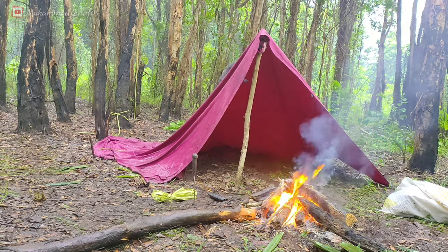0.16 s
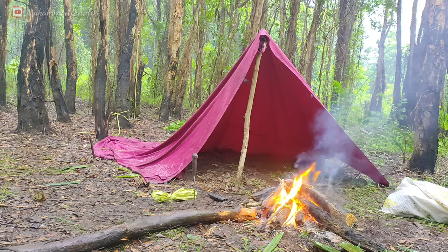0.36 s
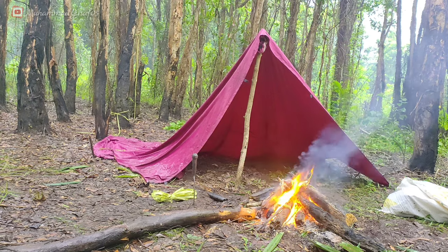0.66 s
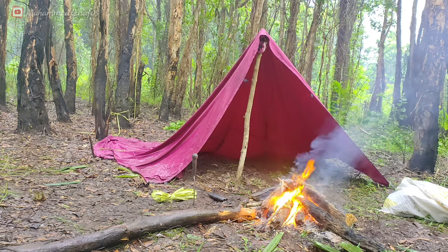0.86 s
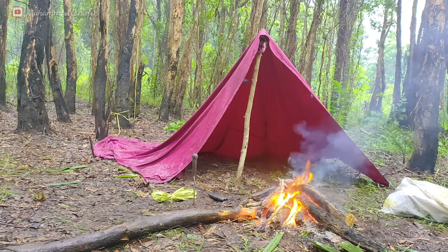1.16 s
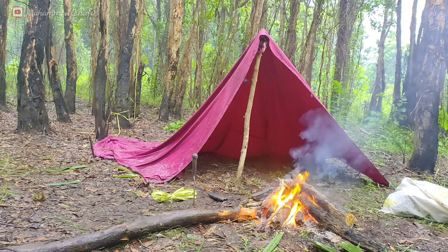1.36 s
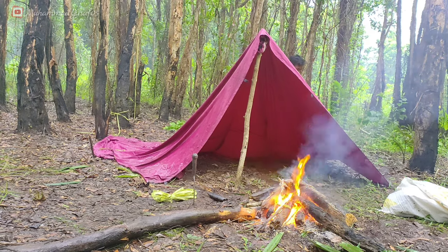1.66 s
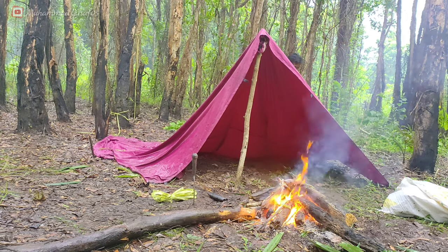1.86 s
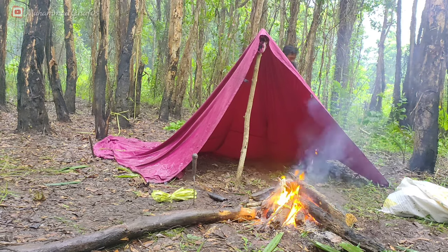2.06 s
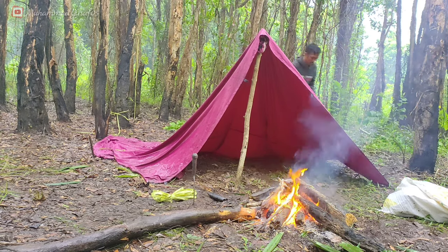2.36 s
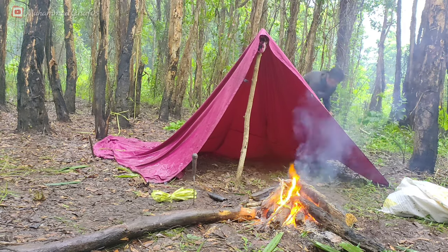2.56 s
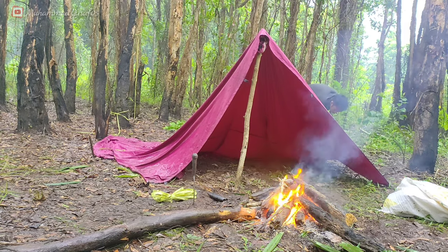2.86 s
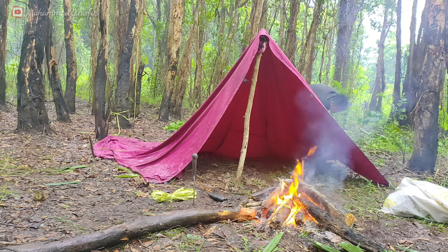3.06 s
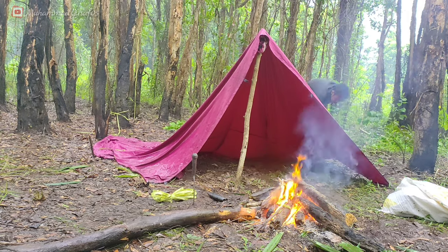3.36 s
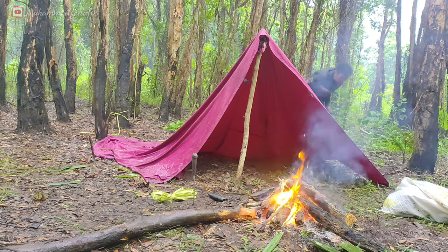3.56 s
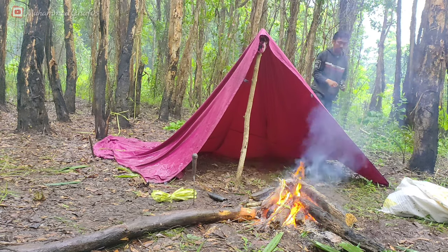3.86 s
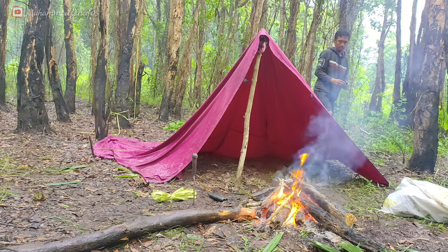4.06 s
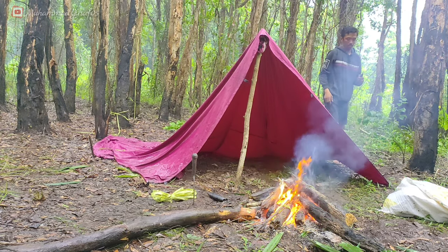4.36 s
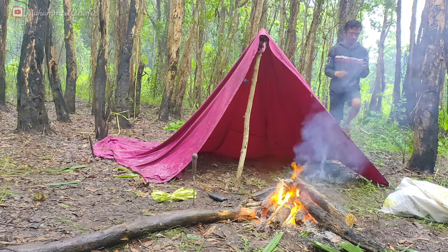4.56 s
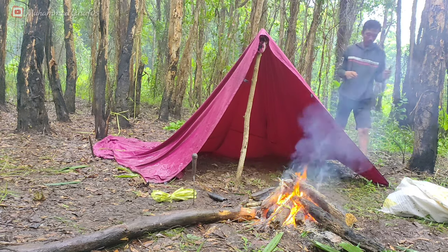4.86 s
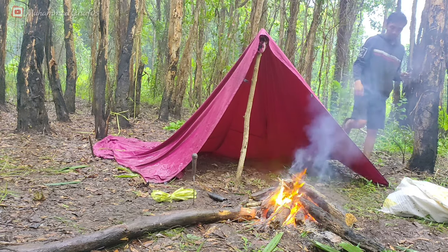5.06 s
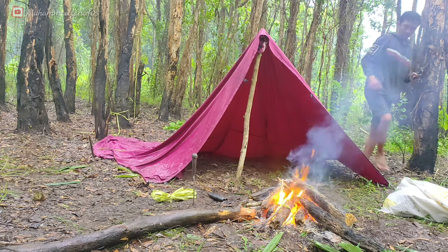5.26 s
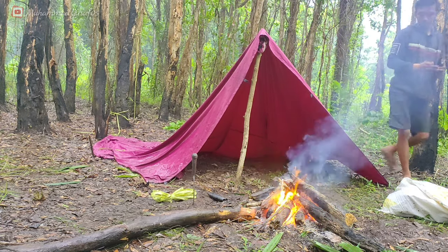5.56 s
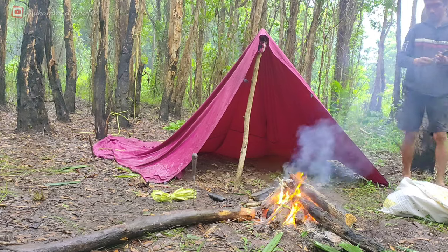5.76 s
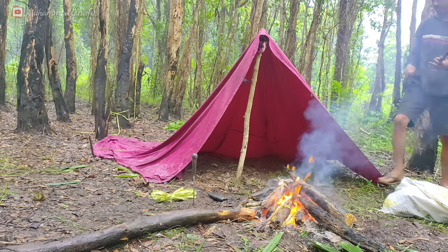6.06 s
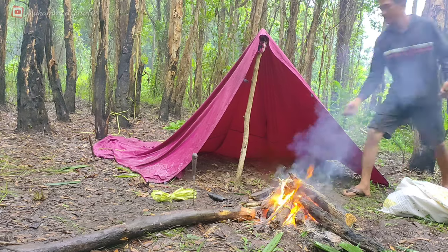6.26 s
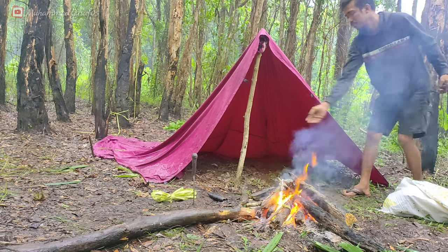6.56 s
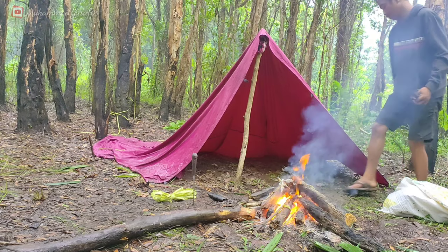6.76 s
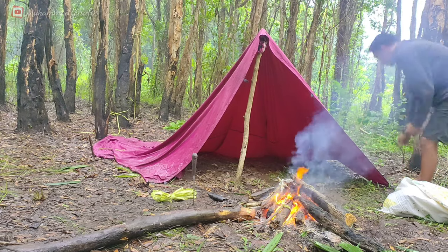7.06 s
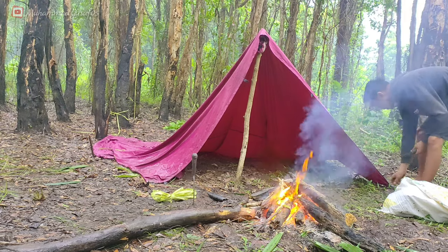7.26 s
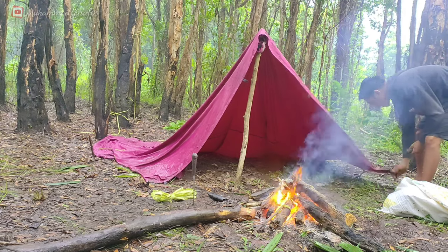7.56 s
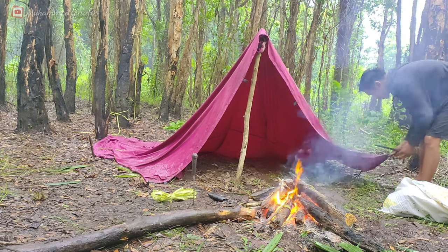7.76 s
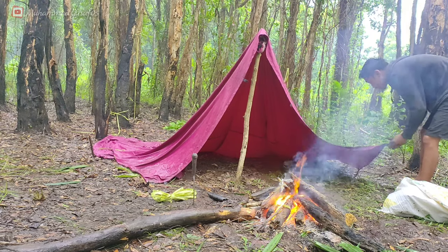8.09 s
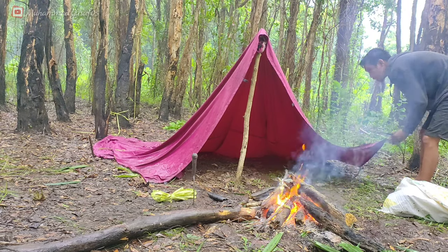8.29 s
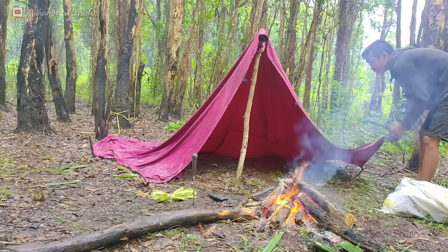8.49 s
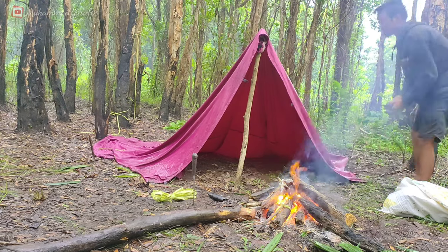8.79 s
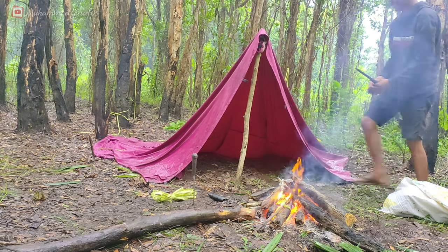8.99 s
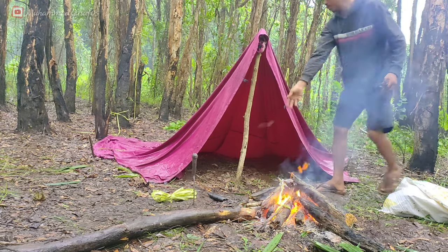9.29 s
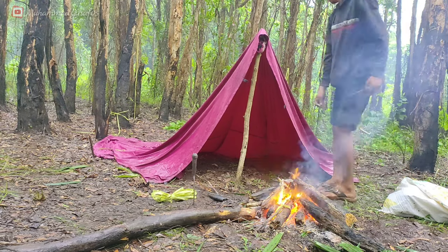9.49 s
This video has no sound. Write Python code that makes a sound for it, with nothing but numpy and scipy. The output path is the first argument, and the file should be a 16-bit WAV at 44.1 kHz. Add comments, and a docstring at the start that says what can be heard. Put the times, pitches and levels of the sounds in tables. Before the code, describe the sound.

Close stereo microphones at a forest camp hear irregular campfire cracks on the left, with fine crackle, bubbling sap and short hisses. Insects and birds fill the distance: cicada tone and buzz in regular alternation, brisk falling calls in the centre, evenly paced low pipes and thin whistles on the left. Occasional hollow knocks and low thuds land left or right. In the last third a rhythmic bush cricket rasp joins on the right, and pops grow denser.

```python
"""Campfire in a forest

A small campfire burns on the left: wood pops and steam spits are short puffs of noise, and
embers tick as tiny ringing clicks. A far insect, likely a cicada, alternates a thin gliding tone
with a buzz built from harmonics. One caller repeats quick falling notes in twos and threes,
another pipes low phrases, birds chirp. Dull knocks and low thuds sound, some under the wood pops.
In the last third a bush cricket, made of noisy wing resonances, starts to rasp on the right.
"""
import sys
import numpy as np
from scipy import signal
from scipy.fft import rfft, irfft
from scipy.io import wavfile

SR = 44100
rng = np.random.default_rng(int(sys.argv[2]) if len(sys.argv) > 2 else 0)


def file_out(sig):
    """Save sig as 16-bit WAV at sys.argv[1]."""
    # one column per channel
    cols = np.atleast_2d(sig).T
    # limit, then scale
    lim = np.clip(cols, -1, 1)
    pcm = np.round(lim * 32767).astype(np.int16)
    wavfile.write(sys.argv[1], SR, pcm)


N = 424683  # length in samples


def from_db(db):
    """Turn decibels into a gain."""
    return np.exp(np.asarray(db) * (np.log(10) / 20))


def rms_one(x):
    """Scale a sound to an rms of 1."""
    return x / np.sqrt(np.mean(x ** 2) + 1e-20)


def in_time(rows):
    """Read each column of a table as a curve, with a value at every sample."""
    s, *columns = np.transpose(rows)
    return [np.interp(np.arange(N) / SR, s, column) for column in columns]


def clock(length_s):
    """Give the sample times of a short sound, in seconds."""
    return np.arange(int(length_s * SR)) / SR


def add(track, s, sound):
    """Mix a sound into a track at time s."""
    i = int(np.clip(s * SR, 0, N - 1))
    track[i:i + len(sound)] += sound[:N - i]


def colour(x, points):
    """Make some pitches stronger and others weaker, following a curve of pitch and level."""
    hz, db = np.transpose(points)
    f = np.maximum(np.arange(N // 2 + 1) * SR / N, 1)
    gain = from_db(np.interp(np.log(f), np.log(hz), db))
    return irfft(rfft(x) * gain, N)


def band(x, hz, width_hz, order=2):
    """Keep only the pitches around a centre."""
    low = np.sqrt(hz ** 2 + width_hz ** 2 / 4) - width_hz / 2
    edges = np.clip([low, low + width_hz], [10, 20], [.43 * SR, .45 * SR])
    sos = signal.butter(order, edges, "band", fs=SR, output="sos")
    return signal.sosfilt(sos, x + 1e-18)


def drift(rate_hz):
    """Wander at random around zero, in straight lines between random points."""
    knots = rng.standard_normal(8000)
    return np.interp(np.arange(N) * rate_hz / SR, np.arange(len(knots)), knots)


def pan(x, left_db):
    """Place a sound left or right; left_db is how much louder the left side is."""
    return x * from_db([[left_db / 2], [-left_db / 2]])


def trees(x, t60_s, scatter_db):
    """Trunks and leaves return a dying spray of uneven echoes, different on each side."""
    t = clock(.6)
    unevenness = from_db(scatter_db * rng.standard_normal((2, len(t))))
    echoes = rng.standard_normal((2, len(t))) * unevenness
    echoes = echoes * from_db(-60 * t / t60_s) * (t > .003)
    echoes /= np.sqrt(np.sum(echoes ** 2, axis=1, keepdims=True))
    return signal.fftconvolve(x[None], echoes, axes=1)[:, :N]


def burst(hz, width_hz, decay_s, order=2):
    """A dying puff of noise through a resonance, with the energy of 1 ms at full scale."""
    t = clock(.06)
    puff = band(rng.standard_normal(len(t)) * np.exp(-t / decay_s), hz, width_hz, order=order)
    return puff * np.sqrt(SR / 1000 / np.sum(puff ** 2))


def note(length_s, start_hz, end_hz, bend=1, waver=0.0068, flutter_db=0):
    """A whistled glide that swells and fades, its pitch and strength slightly unsteady."""
    u = clock(length_s) / length_s
    wobble, flutter = [np.interp(u, np.linspace(0, 1, 14), knots)
                       for knots in rng.standard_normal((2, 14))]
    hz = (start_hz + (end_hz - start_hz) * u ** bend) * (1 + waver * wobble)
    swell = np.sin(np.pi * u) * from_db(flutter_db * flutter)
    return swell * np.sin(2 * np.pi * np.cumsum(hz) / SR)


# tone colour of the air in the leaves: pitch_hz, relative level_db
LEAF_AIR_COLOUR = [(300, -5.5), (700, 2.5), (1500, 3.5), (2500, 2), (3800, 1.5), (4700, -4), (5600, 4.5),
                   (7800, -9.5), (9000, -4), (12000, -4.5), (15000, -2.5)]


def forest():
    """Soft air in the leaves is shaped noise; the hum of far insects is a narrow band of noise."""
    # one part shared by both sides, one part separate for each
    air = rng.standard_normal(N) + 0.97 * rng.standard_normal((2, N))
    air = from_db(-45.3) * rms_one(colour(air, LEAF_AIR_COLOUR))
    hum = band(rng.standard_normal(N) + .7 * rng.standard_normal((2, N)), 4640, 650)
    return air + from_db(-55.5 + 3 * drift(14)) * rms_one(hum)


# the cicada's cycle: a thin tone, then a buzz that overlaps its end
CICADA_START_S, CYCLE_S, TONE_S = -.025, .768, 0.261
BUZZ_AFTER_S, BUZZ_S, BUZZ_FADE_S = .2, .57, 0.064
TONE_HZ, TONE_SAG_HZ, BUZZ_HZ = 3003, 80.3, 1541
# strength of the thin tone, before its pulse and flutter: time_s, level_db
CICADA_TONE_LEVEL = [(0,-43), (.85,-41.5), (2.4,-49), (3.9,-49), (4.7,-43), (6.2,-44.5), (7,-49), (7.8,-45),
                     (9.63,-56)]
# harmonics of the buzz: multiple of BUZZ_HZ, relative level_db
BUZZ_HARMONICS = [(2,-57), (3,-47.5), (4,-52), (5,-55.5)]


def cicada(pulse_hz=18, pulse_depth=.24, jitter=.026, flutter_db=3):
    """A far cicada alternates a softly pulsing, sagging tone with a rough harmonic buzz."""
    tone, effort = np.zeros((2, N))
    t = clock(BUZZ_S)
    swell = np.clip(np.minimum(t, BUZZ_S - t) / BUZZ_FADE_S, 0, 1)
    for s in np.arange(CICADA_START_S, N / SR, CYCLE_S):
        add(tone, s, note(TONE_S, TONE_HZ, TONE_HZ - TONE_SAG_HZ, waver=.004, flutter_db=3.5))
        add(effort, s + BUZZ_AFTER_S, swell)
    pulse = 1 + pulse_depth * np.sin(2 * np.pi * pulse_hz * np.arange(N) / SR)
    tone *= from_db(in_time(CICADA_TONE_LEVEL)[0]) * pulse

    # fast pitch jitter makes the buzz rough
    phase = 2 * np.pi * np.cumsum(BUZZ_HZ * (1 + jitter * drift(700))) / SR
    buzz = sum(from_db(db) * rms_one(np.sin(round(k) * phase)) for k, db in BUZZ_HARMONICS)
    buzz = buzz * effort * from_db(flutter_db * drift(17))
    buzz = from_db(-3) * buzz + from_db(-4) * trees(buzz, t60_s=0.17, scatter_db=2)
    tone = tone + from_db(-7) * trees(tone, t60_s=.37, scatter_db=7)
    return pan(tone, left_db=-2.0) + pan(buzz, left_db=-0.8)


# rising chirps: start_s, length_s, start_hz, end_hz, relative level_db
BIRD_CHIRPS = [(0.39, 0.044, 9260, 11780, -8.5), (0.592, 0.03, 5150, 7300, -13.5),
               (0.618, 0.021, 7520, 11360, -11.5), (0.793, 0.05, 5600, 8000, -16),
               (0.834, 0.012, 7830, 10700, -12.5), (3.129, 0.018, 3680, 4620, -9),
               (3.139, 0.027, 3480, 4500, -24), (5.63, 0.027, 7120, 9970, -18),
               (5.647, 0.03, 10460, 11400, -20), (5.836, .04, 6070, 9840, -20.5),
               (5.876, 0.029, 9800, 10240, -15.5), (5.985, 0.057, 6120, 6770, -18),
               (6.03, 0.022, 7300, 11400, -17), (6.047, 0.033, 6280, 6490, -18.5)]
# thin whistles and short slurs: start_s, length_s, start_hz, end_hz, relative level_db
BIRD_WHISTLES = [(0.265, 0.064, 7660, 7660, -39), (0.548, 0.088, 4650, 4750, -34),
                 (1.621, 0.25, 6780, 6310, -47.5), (2.6, 0.045, 4680, 3760, -35.5),
                 (2.655, 0.02, 4440, 4570, -26.5), (4.077, 0.043, 4150, 4630, -36.5),
                 (4.968, 0.14, 6310, 6700, -40.5), (5.078, 0.17, 6700, 6140, -39),
                 (5.418, 0.048, 8830, 8750, -31), (5.767, 0.013, 4150, 3810, -28.5),
                 (7.489, 0.033, 4600, 4130, -26.5), (7.53, 0.04, 4290, 4870, -29.5),
                 (8.184, 0.12, 6700, 6440, -40), (8.42, 0.038, 4550, 4400, -35),
                 (8.465, 0.037, 4390, 5090, -34)]


def birds():
    """Gliding notes: rising chirps on the left, smeared by the trees, and thin whistles farther off."""
    chirps, far = np.zeros((2, N))
    for s, length_s, start_hz, end_hz, db in BIRD_CHIRPS:
        chirp = note(length_s, start_hz, end_hz, bend=1.1, waver=.028, flutter_db=5)
        add(chirps, s, from_db(db - 19) * chirp)
    for s, length_s, start_hz, end_hz, db in BIRD_WHISTLES:
        whistle = note(length_s, start_hz, end_hz, waver=.022, flutter_db=4.5)
        add(far, s, from_db(db - 7.5) * whistle)
    chirps = chirps + from_db(5.5) * trees(chirps, t60_s=.26, scatter_db=-2.0)
    far = far + from_db(1) * trees(far, t60_s=0.29, scatter_db=-3.5)
    return pan(chirps, left_db=20.5) + pan(far, left_db=26.5)


# phrases of low notes: start_s, number of notes, step_s from note to note,
# first_hz, last_hz, relative first_db, relative last_db
PIPED_PHRASES = [(.035,2,.2,2145,2128,-20,-20), (.53,4,0.22,1900,1930,-26,-23),
                 (1.423,5,0.23,1905,1940,-32,-32.5), (2.74,3,0.21,1998,2170,-23,-22.5),
                 (3.36,4,.211,2155,2105,-32.5,-23), (5.3,6,.2225,2090,2140,-27.5,-23),
                 (7.772,5,0.22,2090,2160,-22,-22.5)]


def piping(uneven_db=1.5, uneven_hz=22):
    """Evenly paced low wavering notes on the left; pitch and strength slide along each phrase."""
    out = np.zeros(N)
    for start, notes, step, first_hz, last_hz, first_db, last_db in PIPED_PHRASES:
        phrase = np.linspace([first_hz, first_db], [last_hz, last_db], int(round(notes)))
        for k, (hz, db) in enumerate(phrase):
            gain = from_db(db - 15.5 + uneven_db * rng.standard_normal())
            hz = hz + uneven_hz * rng.standard_normal()
            pipe = note(0.0303, hz * .99, hz * 1.01, waver=.028, flutter_db=2.5)
            add(out, start + k * step, gain * pipe)
    return pan(out + trees(out, t60_s=.28, scatter_db=6), left_db=28)


SECOND_NOTE_S = .0445  # from the first note to the second
# falling calls: start_s, wait_s from second note to third (0 means only two notes)
FALLING_CALLS = [(.045,0.049), (.583,.053), (1.068,0.068), (1.667,0.047), (2.281,.048), (2.738,.052),
                 (3.161,0), (3.449,0.049), (3.825,.052), (4.29,0.049), (4.829,.053), (5.313,.067),
                 (5.911,.049), (6.369,0), (6.681,.045), (7.139,0.051), (7.56,0), (7.847,0.052),
                 (8.224,0.055), (8.691,0.045), (9.228,.053)]
# strength of the calls: time_s, peak level_db of the notes before octave and echoes
FALLING_CALL_LEVEL = [(0, -23.5), (6.3, -23.5), (6.5, -26.5), (9.6, -27.5)]


def triplets(start_hz=5280, end_hz=4520):
    """Quick falling notes in twos and threes from straight ahead; squaring them adds a faint octave."""
    out = np.zeros(N)
    for s, wait in FALLING_CALLS:
        delays = [0, SECOND_NOTE_S]
        if wait > SECOND_NOTE_S / 2:
            delays.append(SECOND_NOTE_S + wait)
        for delay in delays:
            add(out, s + delay - .001, note(0.0271, start_hz, end_hz))
    out = out + from_db(-16) * band(out ** 2, 9800, 3000)
    out *= from_db(in_time(FALLING_CALL_LEVEL)[0])
    return out + from_db(-21) * trees(out, t60_s=.39, scatter_db=-29)


RASP_START_S, RASP_DB = 6.908, -34
# pace of the bush cricket, which slows briefly, then speeds up and eases at the end:
# time_s, gap_s between strokes
STROKE_PACE = [(6.908,.119), (7.027,.136), (7.69,.126), (8.18,.118), (8.63,.101), (8.94,.102), (9.47,.118)]


def stroke_times():
    """Each stroke of the bush cricket follows the last at its present pace."""
    times = [RASP_START_S]
    while times[-1] < N / SR:
        times.append(times[-1] + np.interp(times[-1], *np.transpose(STROKE_PACE)))
    return times[:-1]


# resonances of the wing, before they rise: pitch_hz, width_hz, relative level_db
WING_RESONANCES = [(2650, 210, -1.5), (5440, 880, -1.5), (6700, 1350, 0.5), (7970, 660, 2)]


def bush_cricket(stroke_s=0.01104, grain_db=3, rise=.06, scrape_db=-10):
    """Each stroke drags a file over the wing, whose resonances rise as it tightens."""
    t = clock(.14)
    middle = t.mean()
    u = (t - middle) / stroke_s
    swell = 1 / (1 + u ** 2 / 2) ** 2
    strokes, tension = np.zeros((2, N))
    for s in stroke_times():
        add(strokes, s - middle, from_db(RASP_DB) * swell)
        add(tension, s - middle, rise * u * np.sqrt(swell))
    wing = from_db(scrape_db) * rms_one(band(rng.standard_normal(N), 3500, 4300))
    for hz, width_hz, db in WING_RESONANCES:
        # slow noise times a sine gives a noisy band that can glide
        slow = signal.butter(2, width_hz / 2, fs=SR, output="sos")
        unsteady = signal.sosfilt(slow, rng.standard_normal(N))
        carrier = np.sin(2 * np.pi * np.cumsum(hz * (1 + tension)) / SR)
        wing = wing + from_db(db) * rms_one(unsteady * carrier)
    grainy = rms_one(wing * from_db(grain_db * drift(400)))
    return pan(strokes * grainy, left_db=-9)


# dull knocks, hollow plops, and the low thuds and mid knocks under some wood pops: start_s,
# level_db (energy against 1 ms at full scale), pitch_hz, width_hz, left_db (how much louder left)
KNOCKS_AND_THUDS = [(.638,-13.5,616,640,13), (.945,-9,610,695,13), (1.334,-16.5,473,203,12),
                    (1.481,-25.5,325,148,-23), (1.49,-27,895,397,-16), (1.622,-25.5,770,246,-11),
                    (1.785,-17.5,660,640,10), (2.5263,-7,475,1050,-12.5), (2.603,-7,420,860,-30),
                    (3.1092,-10,540,1460,-29), (4.363,-22.5,1170,250,21), (4.98,-16,690,630,13),
                    (5.425,-13.5,1310,1110,18), (5.5396,-21.5,915,900,12), (6.734,-6.5,560,640,9),
                    (6.917,-28,614,199,18), (7.036,-23,1060,345,22), (7.281,-8,226,614,-27),
                    (7.287,-16.5,620,640,10), (7.645,-15.5,418,196,-13), (7.654,-11,410,196,-14),
                    (7.823,-8,630,640,11), (8.305,-27.5,990,293,15), (8.887,-29,333,120,9),
                    (9.368,-25.5,1180,450,15), (9.558,-19,1190,690,19)]


def knocks(contact_db=-23):
    """Short low blows, each with a faint bright contact and a tail from among the trunks."""
    out = np.zeros((2, N))
    for s, db, hz, width_hz, left_db in KNOCKS_AND_THUDS:
        contact = from_db(contact_db) * burst(4500, 4500, decay_s=0.00036)
        blow = from_db(db) * (burst(hz, width_hz, decay_s=0.0011) + contact)
        # only the weaker side is turned down
        add(out[0], s, blow * from_db(min(left_db, 0)))
        add(out[1], s, blow * from_db(min(-left_db, 0)))
    tails = np.array([trees(side, t60_s=0.17, scatter_db=6.0)[0] for side in out])
    return out + from_db(-5.5) * tails


# steam spits from the logs: start_s, level_db of the sizzle (energy against 1 ms at full scale)
STEAM_SPITS = [(0.425,-6), (.586,-16.5), (.64,-19), (.8225,-12.5), (1.036,-20), (1.234,-9), (1.335,-18),
               (1.47,-21), (2.8385,-14), (3.76,-16.5), (4.53,-22), (5.124,-18), (6.209,-21), (6.7366,0),
               (7.334,-16), (8.203,-17), (9.076,-18), (9.557,-19)]


def spits(hz=11660, width_hz=900, decay_s=0.012, click_db=-6):
    """A steam pocket opens with a click and empties in a short high sizzle."""
    out = np.zeros(N)
    for s, db in STEAM_SPITS:
        add(out, s - .0015, from_db(db + click_db) * burst(10650, 5200, decay_s=0.0012))
        add(out, s, from_db(db) * burst(hz, width_hz, decay_s=decay_s, order=3))
    return out


# loudest pops of the wood: start_s, crack_db, crack_hz, tick_db
# (levels are energy against 1 ms at full scale)
WOOD_POPS = [(.134,-19,4840,-18), (0.5693,-17.5,1730,-31), (.639,-10,3640,-21), (.6868,-17,4970,-17.5),
             (.973,-19.5,1940,-23), (1.159,-15.5,2900,-39), (1.2329,-16,4300,-27), (1.265,-23,3000,-35),
             (1.286,-26,6060,-5.5), (1.3334,-18,4860,-11), (1.4446,-9.5,2700,-8), (1.469,-17,1810,-16),
             (1.5841,-12,3840,-14.5), (1.786,-12.5,4230,-26), (1.9493,-15,3060,-16.5),
             (2.4555,-10,1810,-12.5), (3.028,-16.5,2560,-20), (3.2745,-22,2630,-24), (3.2881,-7,2430,-10),
             (3.414,-21.5,3660,-22.5), (3.578,-15.5,7140,-15), (3.9934,-5.5,2880,-22),
             (4.0505,-18,2980,-18.5), (4.0874,-18,4700,-40), (4.123,-21,2000,-40), (4.195,-36,6350,-19.5),
             (4.337,-19.5,4830,-15.5), (4.5492,-21.5,5200,-13.5), (5.1225,-24,5770,-10),
             (5.24,-22,4000,-30), (5.306,-15,2570,-12), (5.4243,-9.5,3620,-5.5), (5.5402,-10,3630,-18),
             (6.2075,-29.5,2100,-21), (6.7351,-20,1600,-6), (7.0985,-11,4200,-28), (7.2426,-18,4070,-20.5),
             (7.2875,-16.5,1400,-14), (7.3321,-25.5,4600,-13), (7.4203,-16,2240,-38), (7.824,-9,1800,-31),
             (7.9441,-7,1330,-26), (8.1604,-20,2610,-40), (8.2014,-16,3160,-6), (8.4688,-5.5,2710,-12),
             (8.6392,-9,3260,-4.5), (8.8179,-12,2930,-27), (8.9738,-19.5,3230,-16), (9.074,-38,4800,-12),
             (9.126,-16,3800,-25), (9.317,-10,3100,-25), (9.3723,-13,4670,-23), (9.4964,-18.5,2650,-11),
             (9.5554,-3,3280,-31), (9.5607,-11.5,1900,-30), (9.569,-9,2860,-24)]


def pops(tick_hz=12000, crack_width=.97, ring_db=-6.5, ring_width=.18, upper_ring=1.55,
         snap_db=-17, thud_db=-21, sizzle_db=-14,
         splinter_db=-17.5, splinter_s=.028, splinter_loss_db=6, shard_db=-23):
    """Wood splits with a tick, a dry crack and a slight thud; it rings briefly and splinters follow."""
    out = np.zeros(N)
    for s, crack_db, hz, tick_db in WOOD_POPS:
        crack, tick = from_db(crack_db), from_db(tick_db)
        add(out, s - .0008, crack * from_db(thud_db) * burst(653, 730, decay_s=0.0003, order=3))
        add(out, s - .0005, crack * burst(hz, hz * crack_width, decay_s=.0004, order=4))
        add(out, s - .0004, crack * from_db(snap_db) * burst(6500, 4500, decay_s=0.00034))
        for ring_hz, db in [(hz * 0.922, ring_db), (hz * upper_ring, ring_db - 7.5)]:
            add(out, s, crack * from_db(db) * burst(ring_hz, hz * ring_width, decay_s=0.0017))
        varied_tick_hz = tick_hz * from_db(rng.normal(0, 0.68))
        add(out, s, tick * burst(varied_tick_hz, 4200, decay_s=0.00086, order=3))
        add(out, s + .0015, tick * from_db(sizzle_db) * burst(11660, 1100, decay_s=0.013, order=3))
        # fibres give way just before the split
        add(out, s - .004, crack * from_db(-15) * burst(hz, hz * .6, decay_s=0.0027, order=3))
        add(out, s - .003, tick * from_db(-6) * burst(tick_hz, 1700, decay_s=0.0029, order=3))
        # four splinters at random moments, weaker the later they come
        for delay, detune in rng.random((4, 2)):
            splinter = burst(hz * 2 ** (2 * detune - 1), 640, decay_s=.00083, order=3)
            shard = burst(tick_hz * 2 ** ((detune - 1) / 2), 2500, decay_s=.0008)
            both = crack * from_db(splinter_db) * splinter + tick * from_db(shard_db) * shard
            add(out, s + splinter_s * delay, from_db(-splinter_loss_db * delay) * both)
    return out


def crackle(per_s, low_hz, high_hz, width_hz, spread_db, cluster_db=4.5, count=12):
    """Small clicks come in clusters, mostly faint, each ringing at one of several pitches; rms 1."""
    surge_db = cluster_db * drift(18)
    born = rng.random(N) < per_s * from_db(surge_db) / SR
    size_db = surge_db / 2 + spread_db * np.minimum(rng.exponential(1, N), 3)
    snaps = born * from_db(size_db) * rng.choice([-1, 1], N)
    dealt = rng.integers(0, count, N)  # which pitch each click gets
    pitches_hz = np.linspace(low_hz, high_hz, count)
    return rms_one(sum(band(snaps * (dealt == k), hz, width_hz) for k, hz in enumerate(pitches_hz)))


SAP_DB, SAP_FOLLOWS = -43.5, .75  # bubbling sap at mean activity; share of the embers' swing
# strength of the flame's rumble, before its flicker: time_s, relative level_db
FLAME_LEVEL = [(0,-45), (1.1,-40), (1.7,-51.5), (2.1,-46.5), (2.7,-45), (3.6,-52.5), (4.6,-48.5),
               (5.37,-43), (5.5,-55), (6,-47.5), (7.15,-49), (7.8,-44), (8.2,-50.5), (9.63,-44)]
# tone colour of the flame: pitch_hz, relative level_db
FLAME_COLOUR = [(15, -1.5), (30, -29), (55, -8), (120, -4.5), (200, -7), (400, -13.5), (900, -25.5),
                (2000, -34)]
# activity of the embers: time_s, relative level_db
EMBER_LEVEL = [(0,-46.5), (1.4,-39.5), (1.7,-53), (2.4,-43.5), (2.8,-49), (4.7,-52), (5.2,-45), (5.7,-57),
               (6.5,-51), (6.8,-41), (7.1,-49), (7.7,-47), (8.6,-52), (9.63,-47)]
# how the fire's pops and crackle change on the right side: pitch_hz, change_db
RIGHT_SIDE_COLOUR = [(100, 36), (400, -12), (1500, -21.5), (4000, -19.5), (12000, -22.5)]


def fire():
    """Pops, spits, bubbling sap and ticking embers on the left, over the flame's noisy rumble."""
    flame_db, = in_time(FLAME_LEVEL)
    ember_db, = in_time(EMBER_LEVEL)
    embers = crackle(per_s=330, low_hz=10900, high_hz=12600, width_hz=280, spread_db=13)
    embers = from_db(ember_db + 1.0) * embers
    sap_db = SAP_DB + SAP_FOLLOWS * (ember_db - ember_db.mean())
    sap = crackle(per_s=240, low_hz=599, high_hz=5410, width_hz=200, spread_db=5, count=24)
    sap = from_db(sap_db) * sap
    fibres = crackle(per_s=300, low_hz=2700, high_hz=9080, width_hz=790, spread_db=4.5, count=8)
    fibres = from_db(sap_db - 5.5) * fibres
    hiss = rms_one(band(rng.standard_normal(N), 12400, 2300, order=1))
    hiss = from_db(ember_db - 2 + 1.5 * drift(12)) * hiss
    near = pops() + spits() + embers + sap + fibres + hiss
    left, right = near + from_db(-8.5) * trees(near, t60_s=0.15, scatter_db=6)
    heard = np.array([left, colour(right, RIGHT_SIDE_COLOUR)])
    roar = rng.standard_normal(N) + 0.54 * rng.standard_normal((2, N))
    roar = rms_one(colour(roar, FLAME_COLOUR))
    return heard + pan(from_db(flame_db + 2.56 * drift(14)) * roar, left_db=3.5)


def scene():
    """The fire in front of the living forest."""
    background = forest() + cicada() + birds() + piping() + triplets() + bush_cricket()
    return background + knocks() + fire()


CUTOFF_HZ = 15500


def record(dry):
    """Peaks beyond full scale are flattened, then the treble above the cutoff is removed."""
    treble_cut = signal.ellip(8, .1, 60, CUTOFF_HZ, fs=SR, output="sos")
    return signal.sosfiltfilt(treble_cut, np.clip(dry, -1, 1))


dry = scene()
out = record(dry)
file_out(out)
```